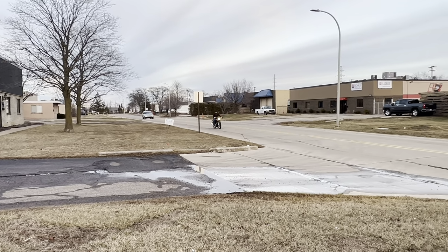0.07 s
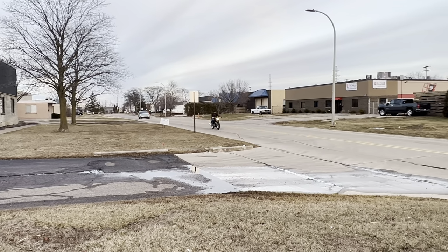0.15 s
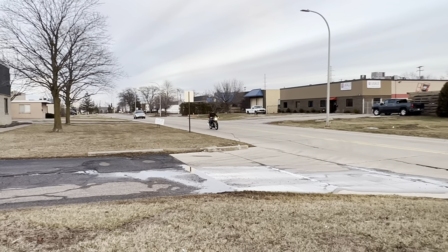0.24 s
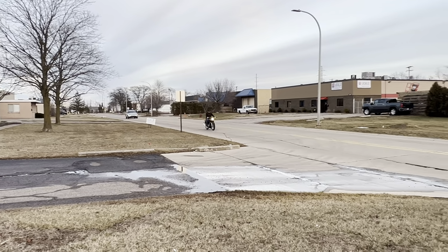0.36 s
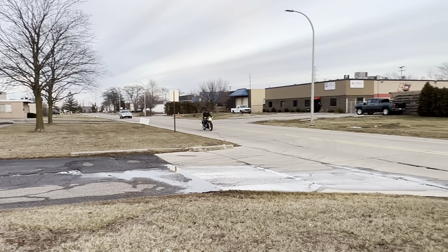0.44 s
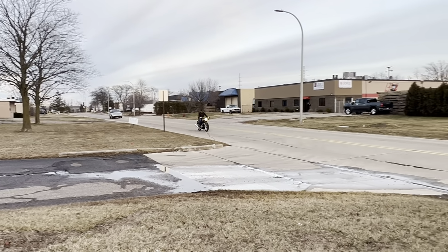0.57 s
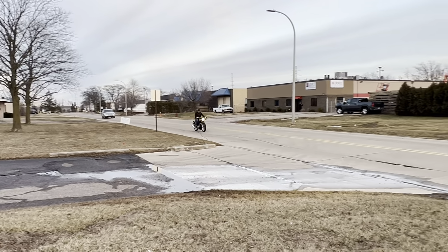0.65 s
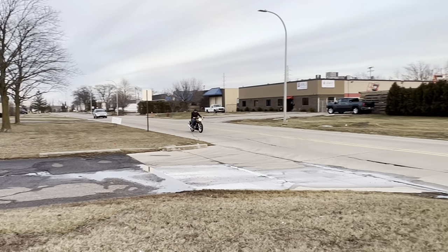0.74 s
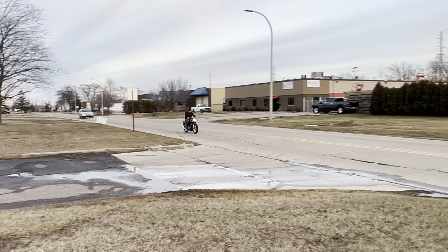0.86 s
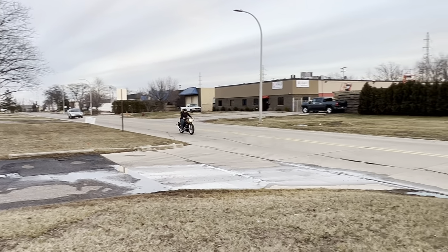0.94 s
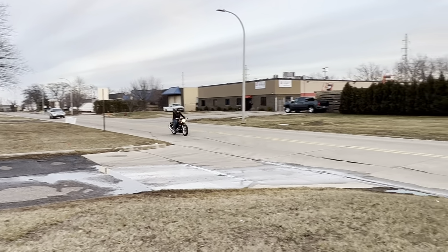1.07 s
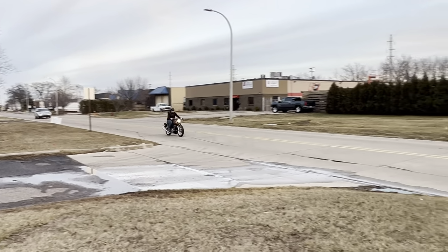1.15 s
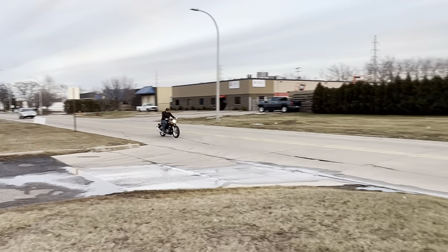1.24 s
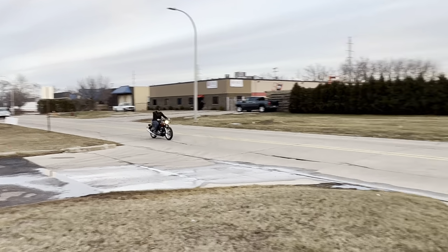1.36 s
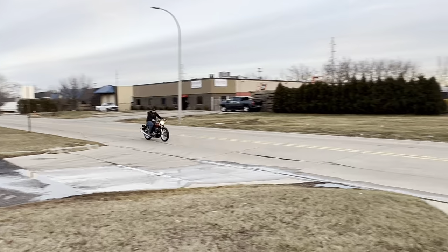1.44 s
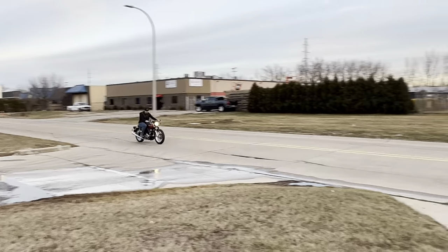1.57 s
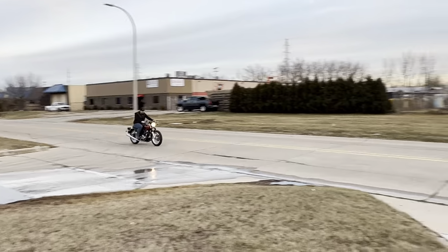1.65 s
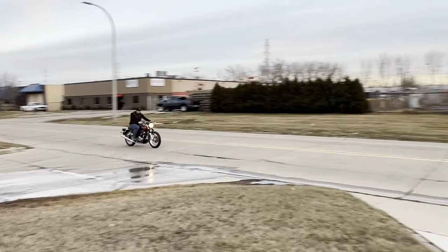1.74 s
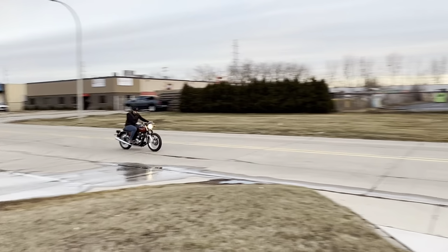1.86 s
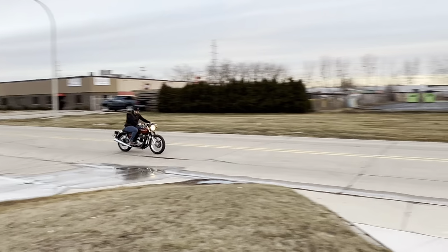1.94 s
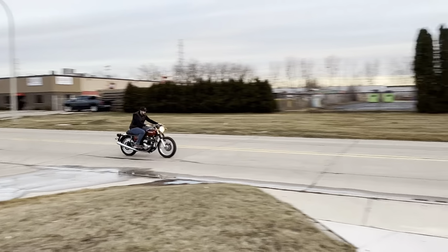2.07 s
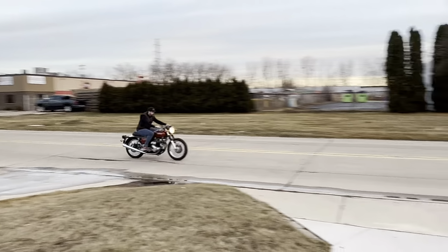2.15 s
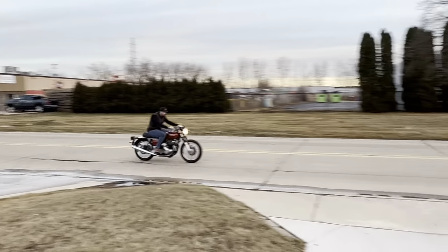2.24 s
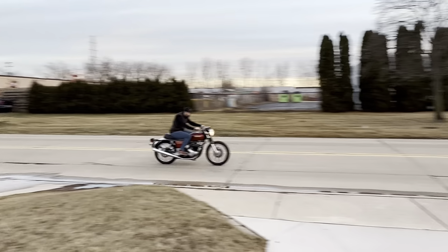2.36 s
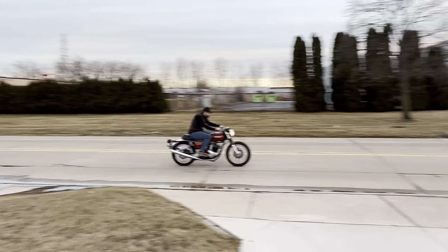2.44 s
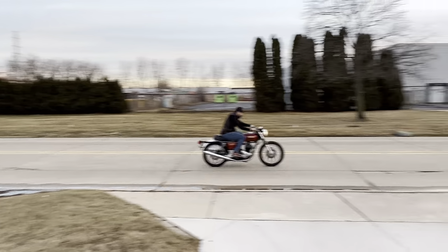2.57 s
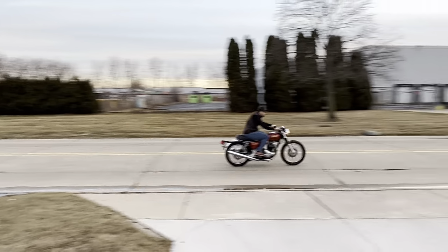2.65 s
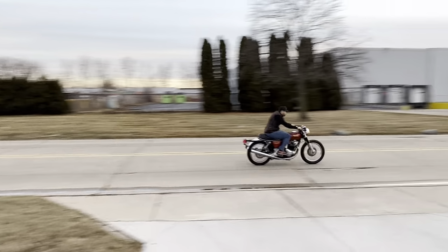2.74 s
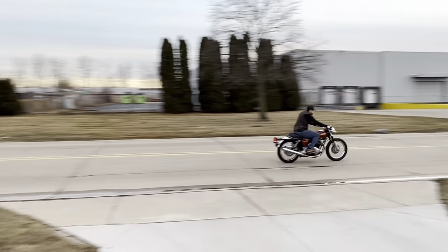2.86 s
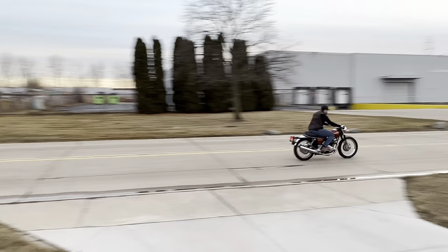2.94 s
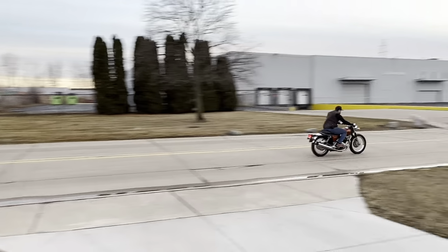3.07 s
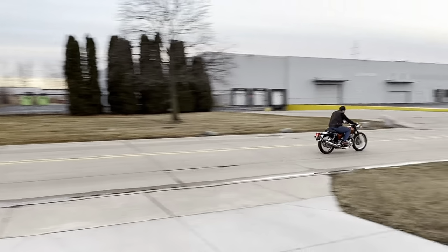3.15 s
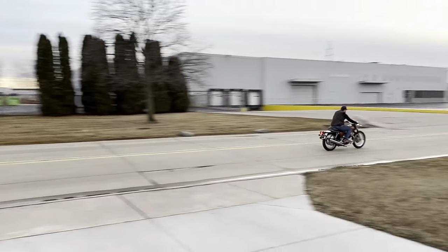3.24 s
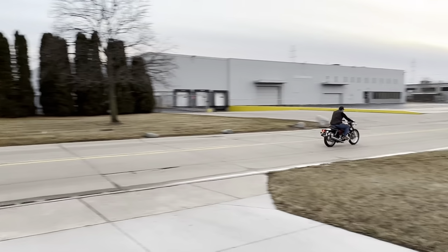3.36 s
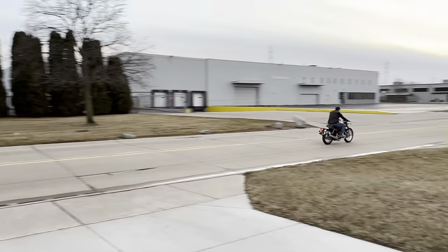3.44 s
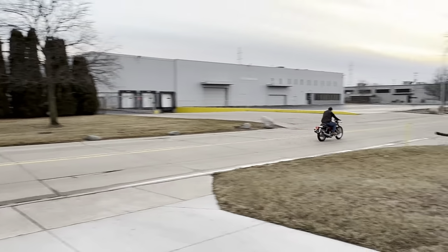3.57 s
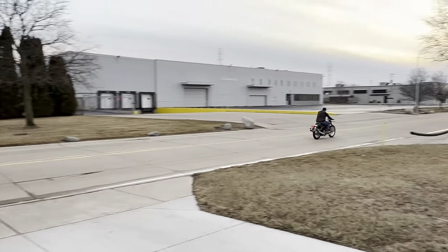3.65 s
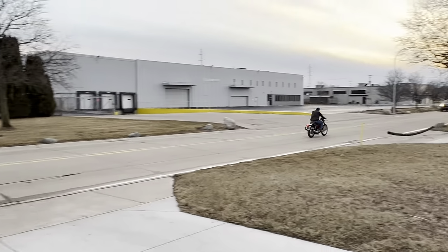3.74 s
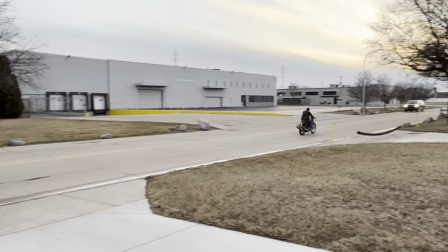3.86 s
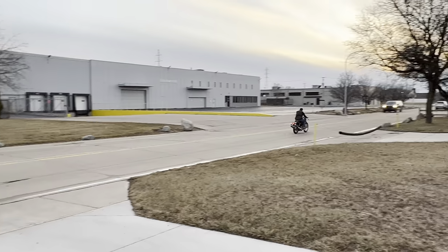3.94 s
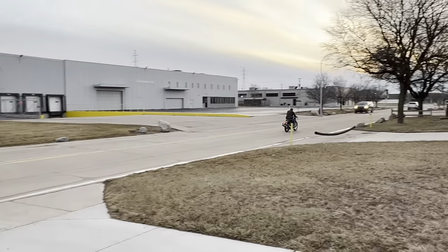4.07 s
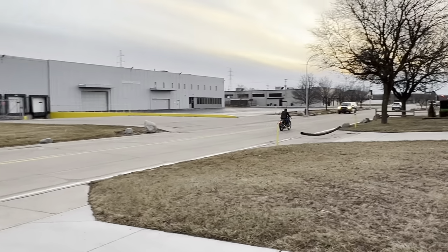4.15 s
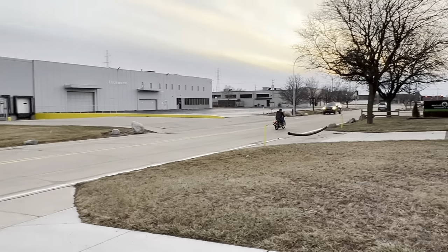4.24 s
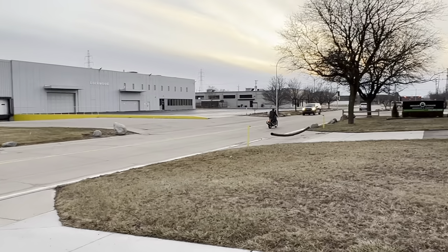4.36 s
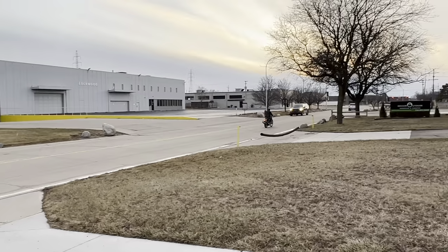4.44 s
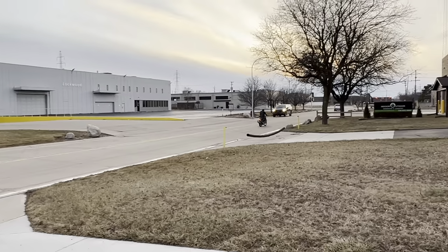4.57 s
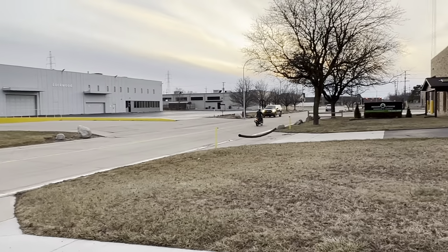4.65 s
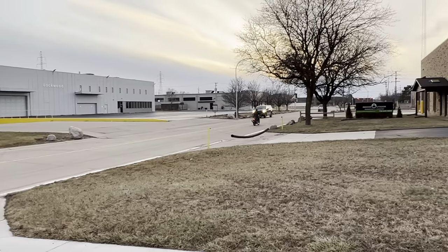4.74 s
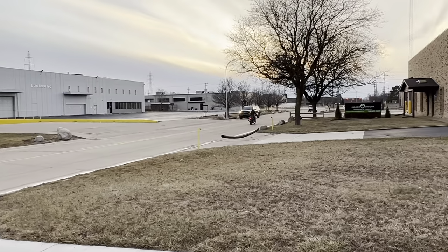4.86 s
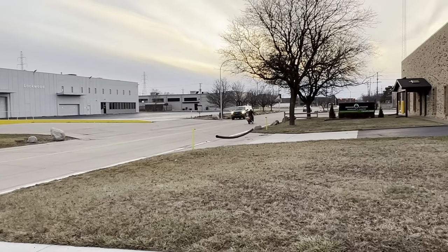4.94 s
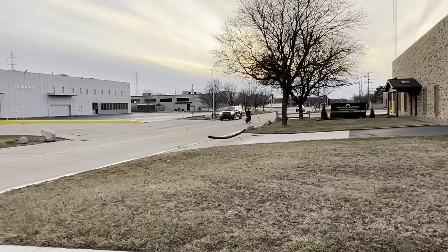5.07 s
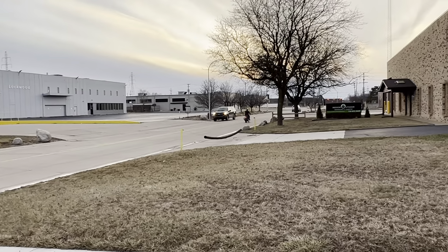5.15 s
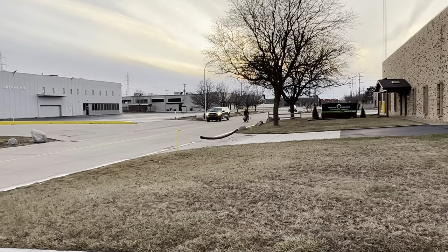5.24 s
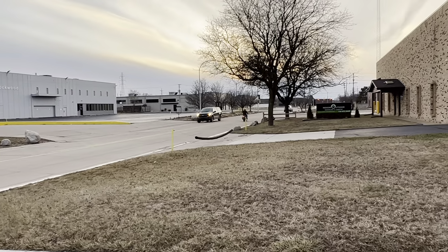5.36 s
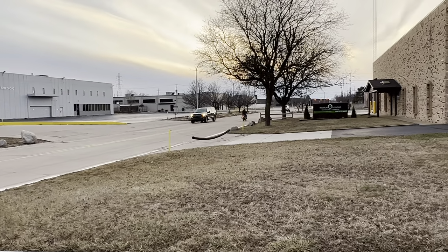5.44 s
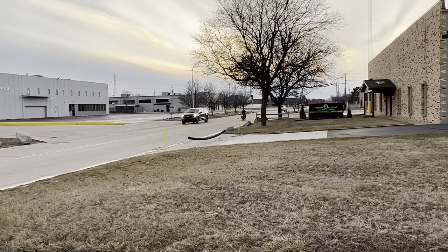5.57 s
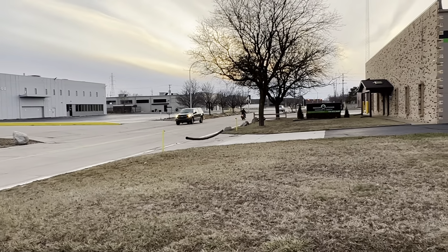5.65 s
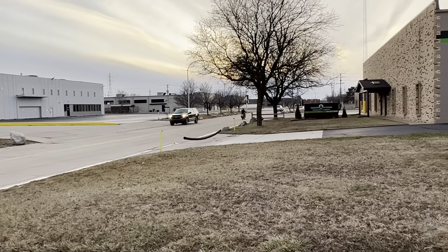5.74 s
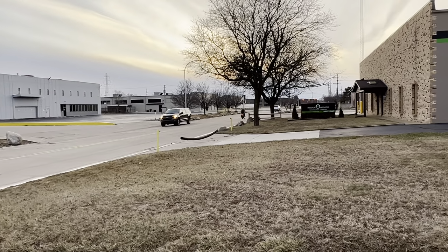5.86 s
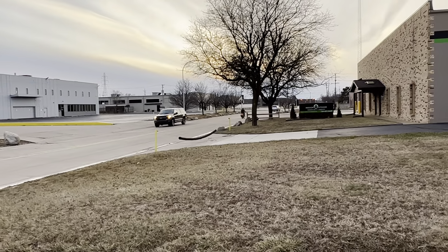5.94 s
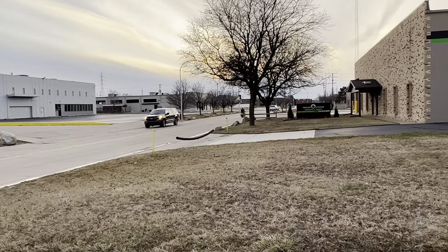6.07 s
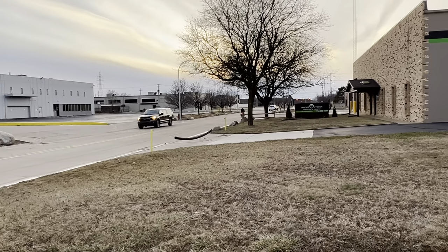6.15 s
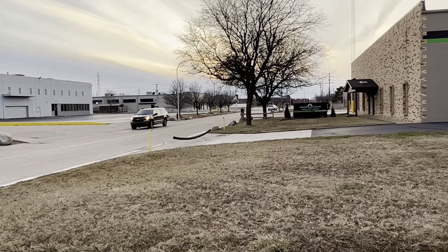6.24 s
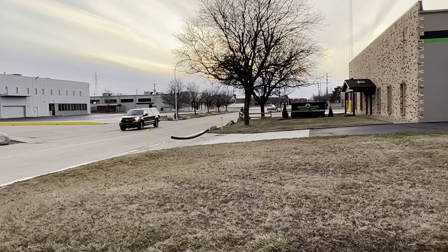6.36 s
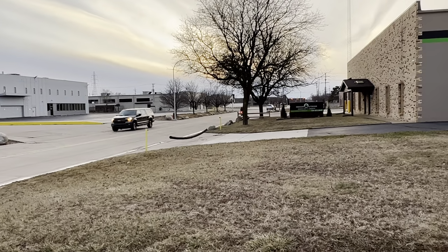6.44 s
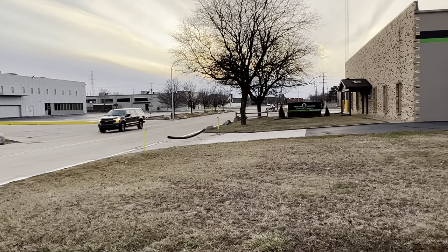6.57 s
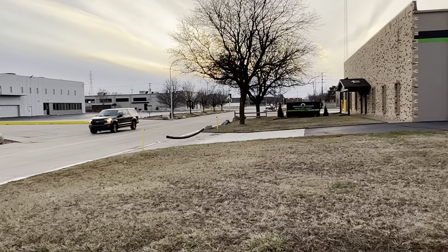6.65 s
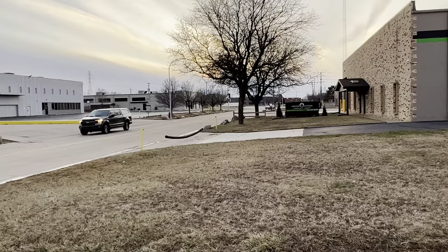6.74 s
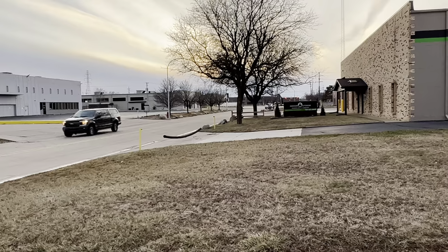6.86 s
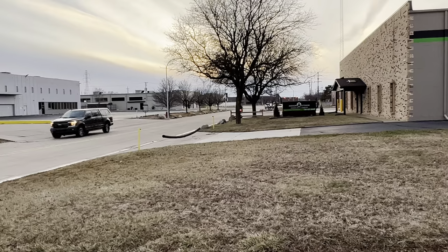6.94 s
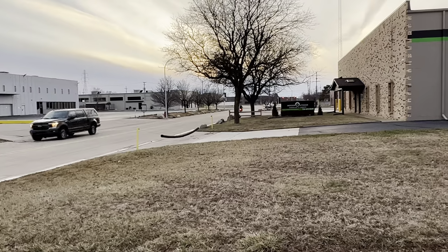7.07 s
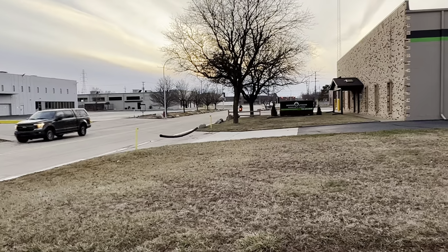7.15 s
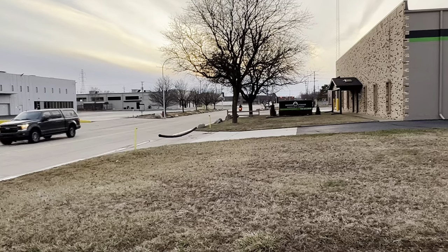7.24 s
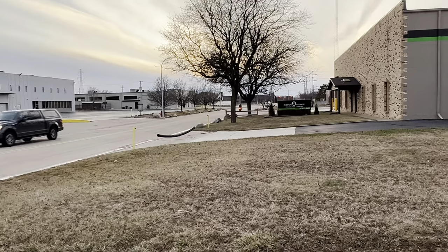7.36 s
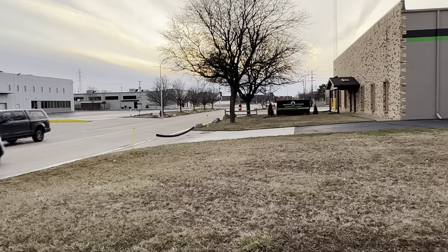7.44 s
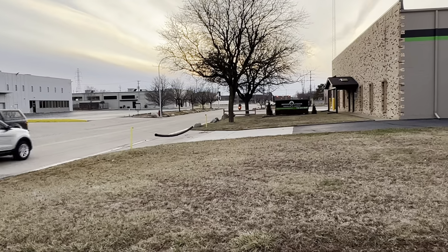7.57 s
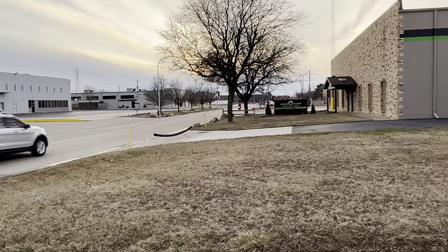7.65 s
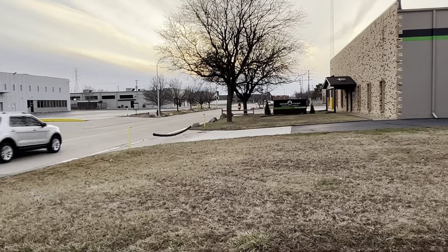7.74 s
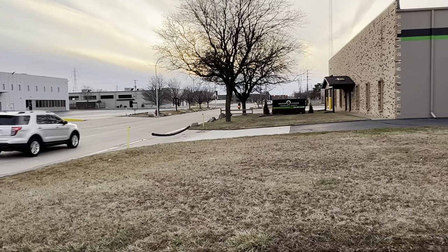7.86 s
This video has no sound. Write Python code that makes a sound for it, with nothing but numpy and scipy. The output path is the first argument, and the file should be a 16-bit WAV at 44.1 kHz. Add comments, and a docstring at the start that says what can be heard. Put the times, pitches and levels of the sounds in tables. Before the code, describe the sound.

Heard from the roadside, a motorcycle grows louder and revs higher, then goes by close with a throbbing bark and a metallic rattle. The note falls at a gear change, climbs again and fades as the throttle shuts, echoing faintly off warehouse walls. Quieter traffic follows: a rush of tyres, a low engine hum and a string of sharp knocks as a pickup crosses joints in the road.

```python
"""A twin-cylinder motorcycle speeds up along a street, passes close by, shifts up and pulls away.
Each firing makes an exhaust pipe boom, bark and rasp, over the clatter of the engine and the tyres.
Then the throttle shuts and the bike burbles into the distance. Warehouse walls throw the sound back,
and oncoming traffic swells, with a pickup knocking over the joints of the concrete road."""
import sys
import numpy as np
from scipy import signal
from scipy.fft import rfft, irfft
from scipy.io import wavfile
from scipy.ndimage import uniform_filter1d, map_coordinates

SR = 44100
rng = np.random.default_rng(int(sys.argv[2]) if len(sys.argv) > 2 else 0)


def to_wav(sig):
    """Store sig (one row per channel, or 1-D mono) as 16-bit WAV at the path in sys.argv[1].

    Samples outside -1..1 are clipped; the rate is SR.
    """
    pcm = np.clip(np.atleast_2d(sig), -1, 1) * 32767
    pcm = np.round(pcm).astype(np.int16)
    wavfile.write(sys.argv[1], SR, pcm.T)  # frames by channels


N = 348390
TIME = np.arange(N) / SR
FREQS = np.fft.rfftfreq(N, 1 / SR)
PASS_S, ROAD_M_PER_S, NEAREST_M = 2.602, 12.35, 9.06  # the bike rides past in a straight line
AIMED_M = 7  # this far past, its pipes point at the listener

# Engine firings per second, as heard: t/s, f/Hz
FIRING_RATE = [(0, 37.91), (0.3, 38.5), (0.65, 40.85), (1, 43.41), (1.25, 45.54), (1.72, 50.14), (2, 52.69),
               (2.25, 54.83), (2.55, 57.12), (2.8, 58.08), (2.88, 52.82), (3.11, 43.62), (3.24, 44.77),
               (3.32, 42.18), (3.6, 43.27), (3.9, 44.49), (4.28, 47.17), (4.68, 49.29), (4.82, 45.87),
               (5.05, 47.25), (6, 44.38), (7.9, 38.14)]
# How much louder left is than right, for the bike's front, its tail and the traffic: f/Hz, level/dB
PAN_FRONT = [(60, 15), (92, -1), (140, 15), (210, 12), (330, -11.5), (500, 10), (770, 1.5), (1170, 3),
             (1790, 0), (2740, -8), (4190, 2), (6410, 15.5), (9810, 0.5), (15000, -3)]
PAN_BEHIND = [(60, 2), (92, 14), (140, 5), (210, -7.5), (330, 2), (500, 11.5), (770, 1), (1170, 8),
              (1790, -0.5), (2740, -8.5), (4190, 3), (6410, 0), (9810, 0), (15000, 1)]
PAN_TRAFFIC = [(60, 9), (110, 1), (200, 1.5), (380, 1.5), (700, 4.5), (1290, 2.5), (2380, -2), (4400, 0),
               (8120, -0.5), (15000, -1)]


def motorcycle():
    """All parts of the bike follow one crankshaft, which runs slightly unevenly."""
    # Engine loudness: t/s, then level/dB of harmonics 1, 2, 3 and of the bark
    engine_levels = [(0.0, -47, -21, -19.5, -36), (0.7, -38, -23, -20, -27), (1.0, -39, -20, -16, -22.5),
                     (1.4, -28, -24.5, -15, -19.5), (2.0, -22, -13.5, -15, -12.5),
                     (2.5, -14.5, -7, -11.5, -14.5), (2.8, -12, -9, -16.5, -9.5),
                     (2.86, -26, -10, -17, -24), (2.93, -34.0, -7, -35, -18),
                     (3.08, -28, -11.5, -34.0, -22.5), (3.16, -37, -16, -17, -18.5),
                     (3.25, -35, -18.5, -13, -17), (3.5, -37, -17.5, -7.5, -19),
                     (3.8, -29.5, -18.5, -20.5, -20), (4.1, -35, -17.5, -15.0, -20),
                     (4.35, -31.5, -21, -18, -23.5), (4.55, -34.0, -23.5, -42, -20.5),
                     (4.7, -34, -30, -21.5, -25), (4.8, -38, -27, -28, -37.5),
                     (5.05, -46.5, -25, -35, -36.5), (5.6, -51, -24, -45, -43),
                     (6.4, -53, -23.5, -41.5, -43.5), (7.0, -55, -33.0, -43.5, -44),
                     (7.9, -57.5, -39, -51, -51)]
    *boom_db, bark_db = curves(engine_levels)
    firing_hz, = curves(FIRING_RATE)
    cycles = np.cumsum(firing_hz) / SR + .635 + .002 * wander(25)  # a firing at each whole number
    _, _, aimed = ride()
    depth = .14 + .21 * aimed  # how much each firing stands out in the clatter and tyre noise
    throb = np.sqrt(1 - depth + depth * puff(cycles, at=.04, width=.12, uneven_db=1, softness=.5))
    tyres = bike_tyres()
    exhaust = boom(cycles, boom_db) + bark(cycles, bark_db) + rushing_gas(cycles, aimed, bark_db)
    return exhaust + throb * (clatter(cycles) + tyres)


def boom(cycles, boom_db, lead_cycles=.32):
    """The lowest harmonics make a deep gulp before each firing; it burbles when the throttle shuts."""
    _, shut, _ = ride()
    waver = .054 + .266 * shut
    sound = np.zeros(N)
    for harmonic, db in enumerate(boom_db, 1):
        gain = gain_of(db) * echo_beating(harmonic) * (1 + waver * wander(23))
        sound -= np.sqrt(2) * gain * np.cos(2 * np.pi * harmonic * (cycles + lead_cycles))
    return sound


def bark(cycles, bark_db, jitter_s=.00005):
    """The two cylinders fire in turn, each ringing its own pipe; no two firings are alike."""
    # A pipe's ring, heard from in front and from behind: f/Hz, level/dB
    pipe_front = [(100, -36.5), (150, -2.5), (200, 2.5), (250, 0.5), (300, -2.5), (365, -2), (420, -5),
                  (470, -5.5), (530, -11), (620, -16), (740, -19.5), (900, -22.5), (1150, -23.5),
                  (1400, -40), (2500, -63)]
    pipe_behind = [(110, -34.5), (175, -6.5), (220, 2.5), (285, 3.5), (320, -9.5), (370, -5.5), (440, -11),
                   (510, -9.5), (600, -27), (690, -22.5), (850, -35), (1300, -44), (2500, -63.5)]
    firings = np.flatnonzero(np.diff(np.floor(cycles))) + 1
    strength, late = rng.standard_normal((len(firings), 2)).T
    cylinder = cycles[firings].astype(int) % 2
    starts = np.clip(firings + (jitter_s * SR * late).astype(int), 0, N - 1)
    pulses = np.zeros((2, N))
    pulses[cylinder, starts] = gain_of(.55 * strength)
    hz = np.fft.rfftfreq(8192, 1 / SR)
    shadow_db = -2.5 - 10 * np.log10(1 + (hz / 450) ** 2)  # the bike hides the far pipe, dulling it
    front, behind = (ring(pulses[0], look_up(pipe, hz)) + ring(pulses[1], look_up(pipe, hz) + shadow_db)
                     for pipe in (pipe_front, pipe_behind))
    passed = np.clip(ride()[0] / AIMED_M, 0, 1)
    beats = (1 - passed) * front + passed * behind
    delay_s = .01002 - .00041 * TIME  # an upside-down reflection follows each beat
    beats = beats - .36 * np.interp(TIME - delay_s, TIME, beats, left=0)
    return gain_of(bark_db) * beats / np.sqrt(uniform_filter1d(beats ** 2, size=SR // 4) + 1e-12)


def rushing_gas(cycles, aimed, bark_db):
    """Gas swirls out of the pipes: a low chuff, and a rasp that sharpens as they face the listener."""
    # Tone of the chuff and of the rasp: f/Hz, level/dB
    chuff_tone = [(30, -32), (60, -18), (130, 1), (250, -5.5), (400, -2.5), (550, -4.5), (750, -11),
                  (1200, -33)]
    rasp_tone = [(300, -14), (600, 18.5), (1000, -15), (1500, 3.5), (1900, -3.5), (3000, 8.5), (4800, 8.5),
                 (7500, 4), (10000, 0), (12000, 4), (14500, -5), (16000, 0)]
    # Rasp loudness: level/dB for each cause in riding_level
    rasp_weights = (-35.5, -12, 10, 5.5, -7.5, -6.5)
    chuff = noise(look_up(chuff_tone), PAN_FRONT)
    chuff *= np.sqrt(.2 + .8 * puff(cycles, at=.01, width=.12, uneven_db=2))
    share = .15 + .8 * aimed  # how much of the rasp comes in sharp puffs
    gate = np.sqrt(1 - share + share * puff(cycles, at=.05, width=.1, uneven_db=1.3, softness=.45))
    rasp = gate * noise(look_up(rasp_tone), PAN_BEHIND, band=(11000, 15500))
    rasp_db = riding_level(rasp_weights) - 1.5 * np.cos(np.pi * cycles)  # one cylinder rasps more
    return gain_of(bark_db - 12.5) * chuff + gain_of(rasp_db) * rasp


def clatter(cycles):
    """Valves and chain rattle the engine cases; the tone changes as the bike shows each side."""
    # Tone of the rattle from four directions: f/Hz, level/dB
    head_on_tone = [(1200, -23), (1550, 4.5), (1900, 7), (2350, 1), (2700, 9), (3100, -1), (3600, 10.5),
                    (4100, 6.5), (4900, 1), (5500, -16), (6200, -4), (6700, -15), (7300, -2.5), (8000, -19),
                    (8800, -49), (12000, -70)]
    front_tone = [(1200, -31), (1550, -3.5), (1800, 7), (2000, 4), (2350, 0), (2700, 1), (3100, 0),
                  (3600, -0.5), (4200, -5), (5100, -8.5), (6000, -5), (6900, -23), (8500, -67),
                  (12000, -79)]
    side_tone = [(1200, -48), (1500, -4), (1850, 8), (2200, 1), (2400, -6.5), (2700, 4), (3300, 2.5),
                 (4200, 4.5), (5000, -9), (6500, -36), (8500, -11), (12000, -18)]
    tail_tone = [(1200, -28), (1550, 4.5), (1850, 12), (2300, -1), (2650, -1), (3300, 6), (5000, 1.5),
                 (8000, -45.5), (12000, -41)]
    # Rattle loudness: level/dB for each cause in riding_level
    clatter_weights = (-24, -10.5, 14, -1.5, -5, 1.5)
    clatter_db = riding_level(clatter_weights)
    band = (1600, 3200)
    head_on, front = (noise(look_up(tone), PAN_FRONT, band) for tone in (head_on_tone, front_tone))
    side, tail = (noise(look_up(tone), PAN_BEHIND, band) for tone in (side_tone, tail_tone))
    angled, turned, gone = ramp(.86, 1.7), ramp(2.46, 2.62), ramp(3.24, 4.13)
    nearing = np.sqrt(1 - angled) * head_on + np.sqrt(angled) * front
    rattle = np.sqrt(1 - turned) * nearing + np.sqrt(turned * (1 - gone)) * side + np.sqrt(gone) * tail
    taps = np.sqrt(.58 + .17 * puff(2 * cycles, at=.21, width=.77, uneven_db=1.5))
    return gain_of(clatter_db) * rattle * taps + cooling_fins(cycles, clatter_db)


def cooling_fins(cycles, clatter_db):
    """Valve knocks set the cooling fins ringing; the ring sinks in pitch as the bike passes."""
    # Notes of the fins and cases: f/Hz, width/Hz, level/dB
    notes = [(1935, 45, 0), (2610, 40, -3), (5750, 400, -13)]
    along_m, _, _ = ride()
    powers = [gain_of(db) ** 2 / (1 + ((FREQS - hz) / width) ** 2) ** 2 for hz, width, db in notes]
    sent_at = np.arange(N) - SR * (np.hypot(along_m, NEAREST_M) - NEAREST_M) / 343  # sound: 343 m/s
    rings = []
    for power in (powers[0], sum(powers[1:])):
        sound = noise(10 * np.log10(power), PAN_FRONT) * np.sqrt(power.sum() / sum(powers).sum())
        rings.append([map_coordinates(channel, [sent_at], order=3, mode="wrap") for channel in sound])
    low, high = np.array(rings)
    flare = gain_of(10.5 * bump(along_m, -7, .92))  # the lowest note's sideways beam sweeps past
    knocks = np.sqrt(.55 + .45 * puff(cycles, at=.75, width=.2, uneven_db=1))
    facing_db = 8.5 * engine_in_view() - 2.5 * ramp(.88, PASS_S)  # the fins beam forwards
    return gain_of(clatter_db - 6 + facing_db) * knocks * (flare * low + high)


def bike_tyres():
    """The bike's tyres roar on the road."""
    # Tone of the roar: f/Hz, level/dB
    tone = [(450, -35), (620, -20), (800, -10), (950, 0), (1150, -1), (1350, -6), (1550, -13), (2100, -35),
            (3500, -80)]
    # Its loudness: level/dB for each cause in riding_level
    tyre_weights = (-29.5, -7.5, 24.5, 1, -1.5, -1)
    level_db = riding_level(tyre_weights) + 1.5 * engine_in_view() + .42 * wander(40)
    return gain_of(level_db) * noise(look_up(tone), PAN_FRONT)


def ride(twist_s=.061):
    """Metres past the listener, how shut the throttle is (0-1), how aimed the working pipes are (0-1)."""
    # Throttle off for the gear change, then to coast away: shuts t/s, opens t/s
    throttle_off = [(2.787, 3.17), (4.671, 9)]
    along_m = ROAD_M_PER_S * (TIME - PASS_S)
    shut = sum(ramp(off, off + twist_s) - ramp(on, on + twist_s) for off, on in throttle_off)
    aimed = (1 - shut) * np.clip(along_m / AIMED_M, 0, 1)
    return along_m, shut, aimed


def riding_level(weights, cruise_hz=50):
    """A part's level in dB: a base value plus weighted causes (distance, revs, direction, throttle)."""
    along_m, shut, _ = ride()
    distance_m = np.hypot(along_m, NEAREST_M)
    behind = np.maximum(along_m / distance_m, 0) ** 2
    revs = np.log2(curves(FIRING_RATE)[0] / cruise_hz)
    causes = [np.ones(N), np.log2(distance_m / NEAREST_M), revs, behind, shut, shut * behind]
    fade_db = -4 * ramp(2.9, 13)  # the bike fades a little more as it rides away
    return np.array(weights) @ np.array(causes) + fade_db


def engine_in_view():
    """Rises to 1 where wheel and rider no longer hide the approaching engine."""
    return bump(ride()[0], centre=-10.5, width=6.9)


def echo_beating(harmonic, fade_s=.11):
    """One harmonic of the boom swells and dips as its wall echo drifts in and out of step."""
    # Spells of beating: harmonic, two edge times t/s (reversed order flips the echo),
    # beat reference t/s, period/s, echo share
    spells = [(2, 1.3, 0.93, 0.2, 0.195, 0.24), (2, 4.5, 9, 5.07, 0.2816, 0.46)]
    gain = np.ones(N)
    for which, edge_a, edge_b, reference, period, echo in spells:
        if round(which) == harmonic:
            window = ramp(edge_a, edge_a + fade_s) - ramp(edge_b, edge_b + fade_s)
            gain *= abs(1 + echo * window * np.exp(2j * np.pi * (TIME - reference) / period))
    return gain


def road_joints(width_hz=330, fade_s=.06):
    """The pickup's tyres slap the joints: each gives a sharp knock and a short burst of tread noise."""
    # Slaps: t/s, level/dB, f/Hz
    slaps = [(5.199, -27, 1200), (5.274, -30, 1400), (5.457, -25, 1350), (5.678, -29, 1030),
             (5.915, -29, 900), (6.077, -30, 3000), (6.412, -20, 800), (6.436, -24, 1100),
             (6.473, -24, 700), (6.66, -25, 650), (6.701, -19, 700), (6.708, -28, 2200), (6.827, -22, 780),
             (7.055, -23, 620), (7.117, -14, 850), (7.184, -27, 760), (7.343, -15, 780), (7.412, -26, 600),
             (7.454, -24, 1900)]
    track, t = np.zeros((2, N)), np.arange(SR // 10) / SR
    stereo_phase = np.array([[.4], [-.4]])
    for start_s, db, hz in slaps:
        envelope = np.exp(-np.pi * width_hz * t) * (1 - np.exp(-t * hz * 4))
        knock = envelope * np.sin(2 * np.pi * hz * t + stereo_phase)
        bandpass = signal.butter(2, [hz * .7, hz * 1.4], "band", fs=SR)
        tread = unit_level(signal.lfilter(*bandpass, rng.standard_normal((2, len(t)))))
        slap = gain_of(db + 6) * (knock + .16 * tread * gain_of(-60 * t / fade_s))
        slot = track[:, round(start_s * SR):][:, :len(t)]
        slot += slap[:, :slot.shape[1]]
    return track


def traffic_tyres():
    """The tyres of oncoming vehicles swell and fade over the wash of distant streets."""
    # Vehicles: loudest t/s, half width/s, then level/dB of roar, rush and hiss
    vehicles = [(6.85, 0.99, -44, -44, -55), (7.95, 0.7, -47, -71, -54.5)]
    # Distant streets: level/dB of roar, rush and hiss
    distant_db = (-76, -53.5, -61)
    # Tone of each layer of tyre noise: f/Hz, level/dB
    roar = [(300, -8.5), (500, 1.5), (700, -2), (880, 1), (1200, -14), (2000, -54)]
    rush = [(600, -22), (950, -2), (1200, 3.5), (1500, -3.5), (1850, -3), (2300, -13.5), (3300, -15.5),
            (5000, -63.5)]
    hiss = [(2200, 6), (3600, 12), (4500, 3), (5500, 1), (7000, -2.5), (8500, -9), (10000, -33),
            (12500, -29), (15500, -45), (16500, -55.5)]
    whirr = [(1300, -32), (1750, 0.5), (2200, -2), (2750, -6), (3100, -4.5), (3500, -42)]
    power = gain_of(distant_db)[:, None] ** 2
    for loudest_s, width_s, *db in vehicles:
        power = power + gain_of(db)[:, None] ** 2 / (1 + ((TIME - loudest_s) / width_s) ** 2)
    roar_gain, rush_gain, hiss_gain = np.sqrt(power)
    sound = roar_gain * gain_of(2.2 * wander(27)) * noise(look_up(roar), PAN_TRAFFIC, direct=.087)
    sound += rush_gain * gain_of(wander(17)) * noise(look_up(rush), PAN_TRAFFIC, direct=.026)
    sound += hiss_gain * gain_of(.96 * wander(30)) * noise(look_up(hiss), PAN_TRAFFIC, direct=.37)
    facing = bump(TIME, 6.64, .57 * np.sqrt(2))  # the pickup's tyres point at the listener
    sound += gain_of(-49) * facing * noise(look_up(whirr), PAN_TRAFFIC, direct=.11)
    return road_reflection(sound)


def road_reflection(sound, width_hz=480):
    """Sound bouncing off the road cuts or lifts one band, which moves as the pickup nears."""
    # The moving band: t/s, f/Hz, level/dB
    band = [(5, 2392, -3), (5.6, 2660, 1), (6, 3800, 0), (6.4, 3464, -6), (6.7, 3330, -12), (7, 3650, -5),
            (7.35, 4200, 3.5)]
    hz, t, spectrum = signal.stft(sound, SR, nperseg=512)
    band_hz, band_db = curves(band, t)
    spectrum *= gain_of(band_db * bump(hz[:, None], band_hz, width_hz))
    return signal.istft(spectrum, SR, nperseg=512)[1][:, :N]


def traffic_engines():
    """The pickup's engine hums over the rumble of traffic and the drone of distant engines."""
    # The pickup's hum: t/s, f/Hz, level/dB
    pickup = [(4.7, 130.3, -35), (6.2, 131.2, -42.5), (6.8, 127.2, -27.5), (7.3, 120.7, -33),
              (7.6, 117.5, -28.5), (7.9, 112.7, -30.5)]
    # Tone of the rumble and of the drone: f/Hz, level/dB
    rumble_tone = [(18, -63), (30, -39), (43, -31), (96, 5.5), (118, 1), (178, 0), (259, -1), (346, -10.5),
                   (373, -9), (523, -23), (600, -29), (780, -72), (1320, -120)]
    drone_tone = [(35, -23), (55, 9), (68, 5.5), (82, 18), (120, -49)]
    rumble = gain_of(-43 + 11 * ramp(3.7, 5.9)) * noise(look_up(rumble_tone), PAN_TRAFFIC)
    hum_hz, hum_db = curves(pickup)
    phase = 2 * np.pi * np.cumsum(hum_hz * (1 + .014 * wander(15.5))) / SR
    hum = gain_of(hum_db + 1.5 * wander(6)) * (np.sin(phase) + np.sin(phase / 2))
    drone = gain_of(-33 - 1.1 * TIME) * noise(look_up(drone_tone), PAN_TRAFFIC)
    return hum + rumble + drone


def wall_echoes(sound):
    """The walls scatter echoes, nearly alike on left and right in the bass."""
    # Time an echo takes to fade by 60 dB: f/Hz, t/s
    fade_times = [(80, 0.8), (400, 0.98), (2000, 0.24), (10000, 0.11)]
    echoes = rng.choice([-1., 1.], (2, SR)) * (rng.random((2, SR)) < 1 / 20)
    echoes[:, :SR // 40] = 0  # nothing returns in the first 25 ms
    hz, t, spectrum = signal.stft(echoes, SR, nperseg=256)
    same = 1 / (1 + (hz[:, None] / 600) ** 2)
    spectrum[1] = same * spectrum[0] + np.sqrt(1 - same ** 2) * spectrum[1]
    spectrum *= gain_of(-60 * t / look_up(fade_times, hz)[:, None])
    tail = signal.istft(spectrum, SR, nperseg=256)[1]
    return signal.fftconvolve(sound.mean(0)[None], tail / np.linalg.norm(tail[0]), axes=1)[:, :N]


def noise(tone_db, pan, band=None, direct=1):
    """Stereo noise of level 1 (within band, in Hz, if given); less direct makes the sides less alike."""
    # How far the right side lags the left: f/Hz, phase/rad
    lag = [(0, 0), (1200, .2), (1500, -1), (2400, -.3), (2900, 1.7), (3700, 2.5), (4600, 1.3), (5400, -1.4),
           (6500, -.2), (8300, -1.1), (9200, -2.8), (10400, -3.2), (11500, -4.4), (12700, -6.28),
           (14300, -6.28), (15800, -8.8)]
    # How alike the sides are: f/Hz, likeness (0-1)
    likeness = [(100, 1), (400, .95), (1000, .8), (3000, .8), (4500, .7), (5300, .45), (7500, .55),
                (9800, .98), (11800, .8), (13300, .98), (15500, .7)]
    shared, separate = rfft(rng.standard_normal((2, N)))
    same = np.clip(direct * look_up(likeness), 0, 1) ** .5
    tilt = gain_of(look_up(pan) / 2)
    right = (same * shared + np.sqrt(1 - same ** 2) * separate) * np.exp(-1j * look_up(lag))
    spectrum = np.array([shared * tilt, right / tilt]) * gain_of(tone_db)
    inside = 1 if band is None else (FREQS > band[0]) & (FREQS < band[1])
    return irfft(spectrum, N) / irfft(spectrum.mean(0) * inside, N).std()


def puff(cycles, at, width, uneven_db, softness=1):
    """One burst of power each cycle, quick to rise and slower to die, no two alike; average 1."""
    count, place = np.divmod(cycles - at + 1, 1)
    sizes = gain_of(uneven_db * rng.standard_normal(int(count.max()) + 1))
    return unit_level(sizes[count.astype(int)] * place ** softness * np.exp(-place / width)) ** 2


def ring(pulses, tone_db):
    """Each pulse starts a ring of this tone, with a sharp front and nothing before it."""
    log_gain = np.log(gain_of(tone_db))
    mirrored = np.r_[log_gain, log_gain[-2:0:-1]]
    one_ring = np.fft.ifft(np.exp(signal.hilbert(mirrored).conj())).real
    return signal.oaconvolve(pulses, one_ring[:len(log_gain)])[:N]


def wander(rate_hz):
    """A random drift of level 1, mostly slower than rate_hz."""
    return unit_level(irfft(rfft(rng.standard_normal(N)) / (1 + (FREQS / rate_hz) ** 4), N))


def ramp(start_s, end_s):
    """Rises from 0 to 1 between two moments."""
    return np.clip((TIME - start_s) / (end_s - start_s), 0, 1)


def bump(x, centre, width):
    """A bell curve that reaches 1 at the centre."""
    return np.exp(-((x - centre) / width) ** 2)


def curves(table, t=TIME):
    """Each column of a time table, joined up with straight lines."""
    times, *columns = np.transpose(table)
    return [np.interp(t, times, column) for column in columns]


def look_up(table, hz=FREQS):
    """A frequency table's value at each hz, joined up on a log scale."""
    freqs, values = np.transpose(table)
    return np.interp(np.log(hz + 1), np.log(freqs + 1), values)


def gain_of(db):
    """Decibels to amplitude."""
    return 10 ** (np.asarray(db) / 20)


def unit_level(x):
    """Scales a signal to an average (rms) level of 1."""
    return x / np.sqrt(np.mean(x ** 2) + 1e-20)


def scene():
    """Bike, knocks and traffic; the bike has the smallest share of echo when it is close."""
    bike, knocks = motorcycle(), road_joints()
    echo_db = -14 - 9 * ramp(0, 1.3) + 6 * ramp(3.3, 4.6)
    echoes = wall_echoes(gain_of(echo_db) * bike + gain_of(-13) * knocks)
    return bike + knocks + echoes + traffic_tyres() + traffic_engines()


def record(dry):
    """The microphone cuts deep bass, turns the loud pass down, rounds off peaks and cuts top treble."""
    threshold_db, squeeze, recover_db_per_s, ceiling = -10.5, .93, 6, .92
    thinned = signal.sosfiltfilt(signal.butter(4, 33, "high", fs=SR, output="sos"), dry)
    power_db = 10 * np.log10(abs(uniform_filter1d((thinned ** 2).mean(0), size=SR // 10)) + 1e-12)
    recovery_db = recover_db_per_s * TIME
    held_db = np.maximum.accumulate(power_db + recovery_db) - recovery_db
    ducked = thinned / gain_of(squeeze * np.maximum(held_db - threshold_db, 0))
    rounded = ducked / (1 + (ducked / ceiling) ** 8) ** (1 / 8)
    lowpass = signal.firwin(511, 15900, window=("kaiser", 9), fs=SR)
    return signal.oaconvolve(rounded, lowpass[None], "same")


dry = scene()
out = record(dry)
to_wav(out)
```